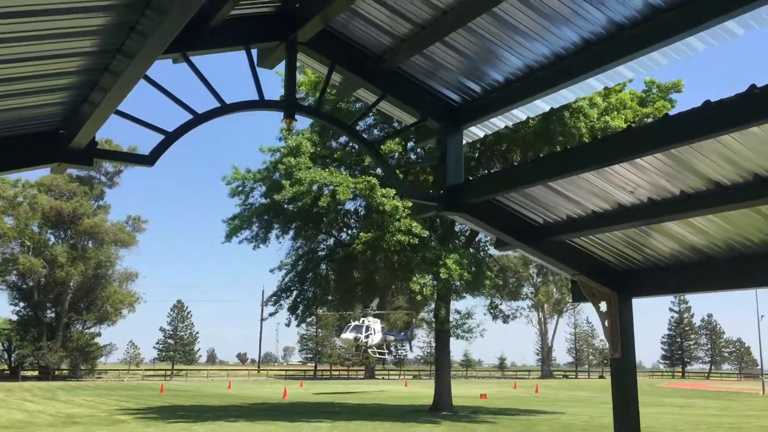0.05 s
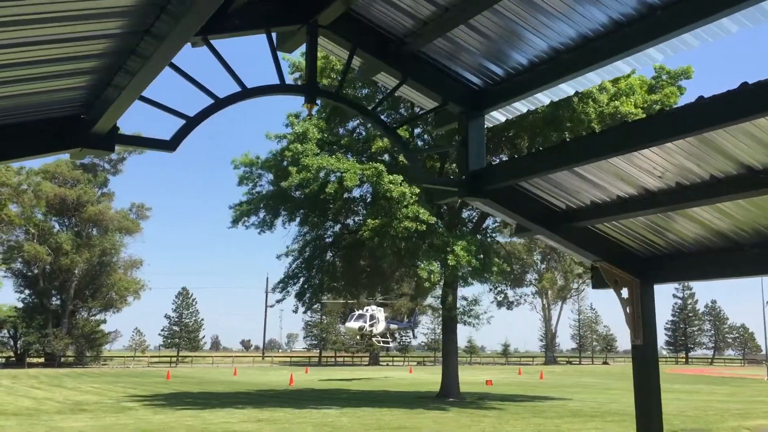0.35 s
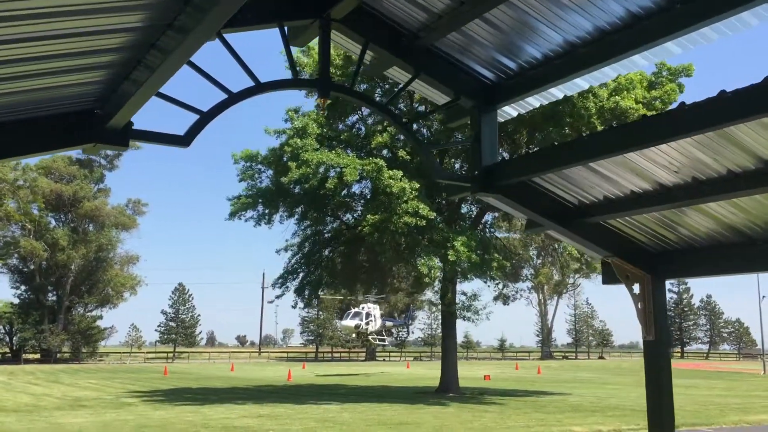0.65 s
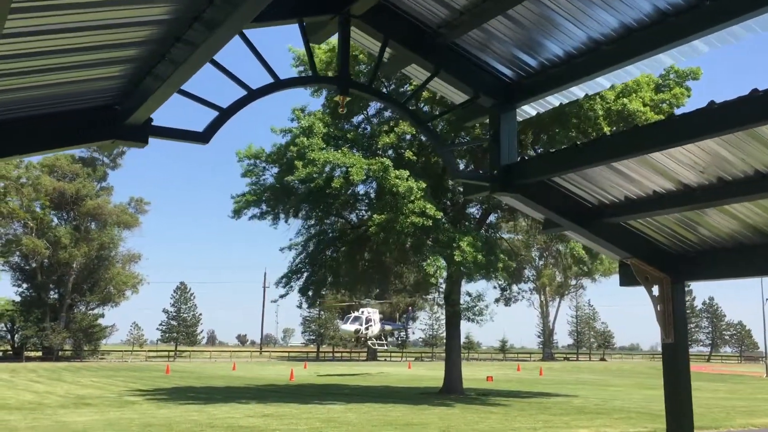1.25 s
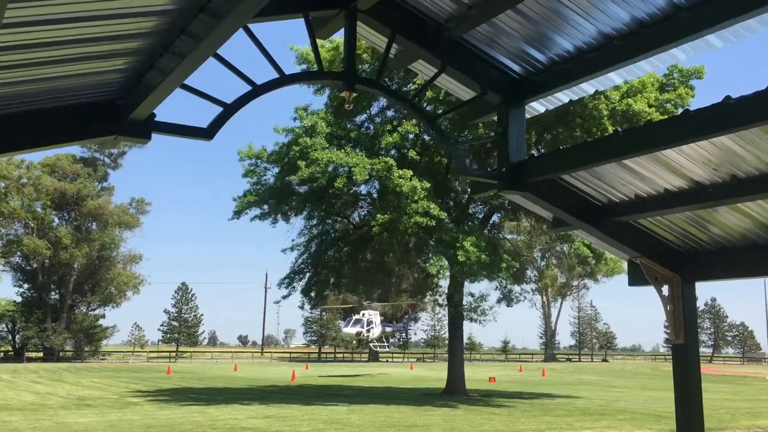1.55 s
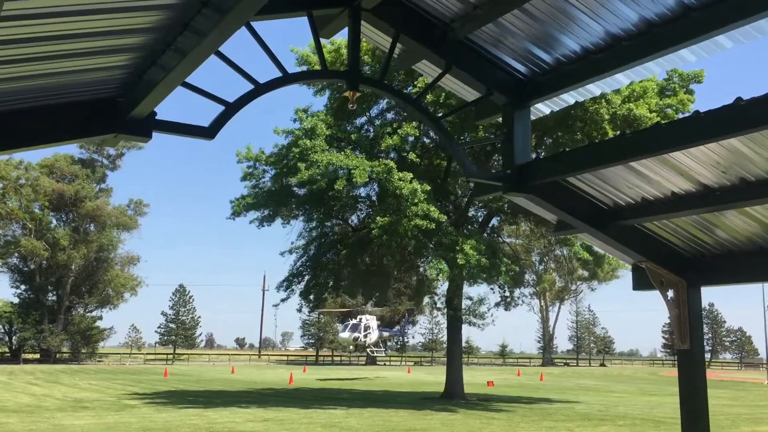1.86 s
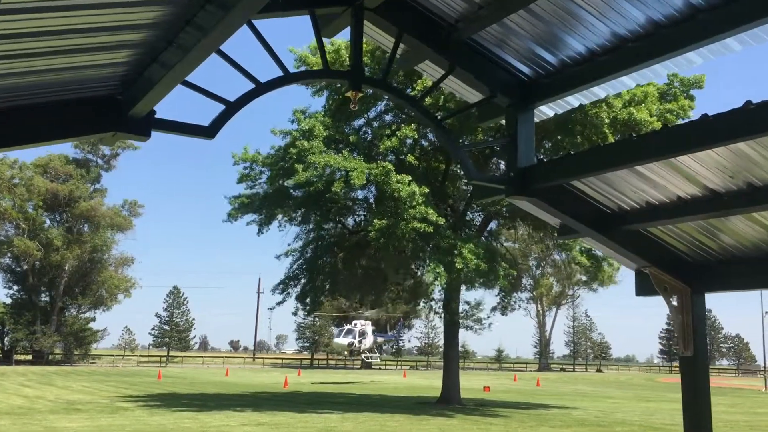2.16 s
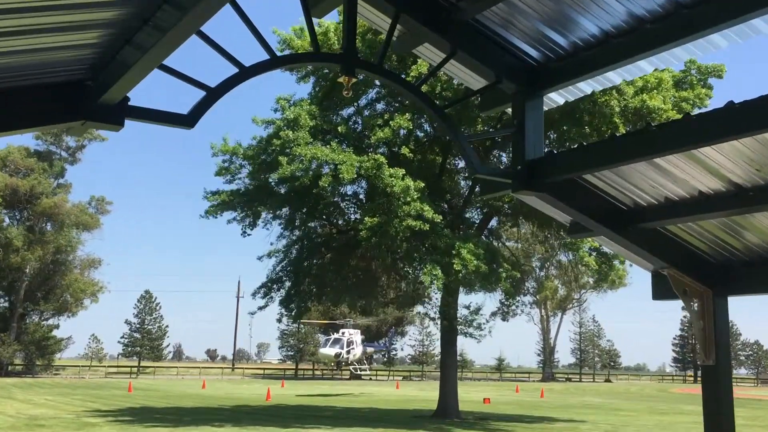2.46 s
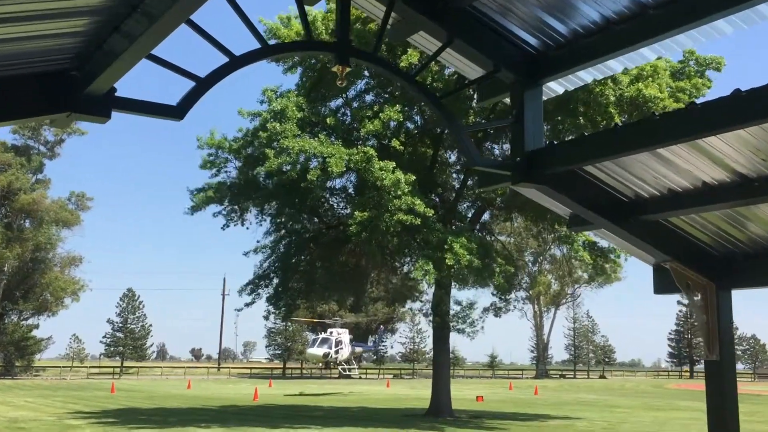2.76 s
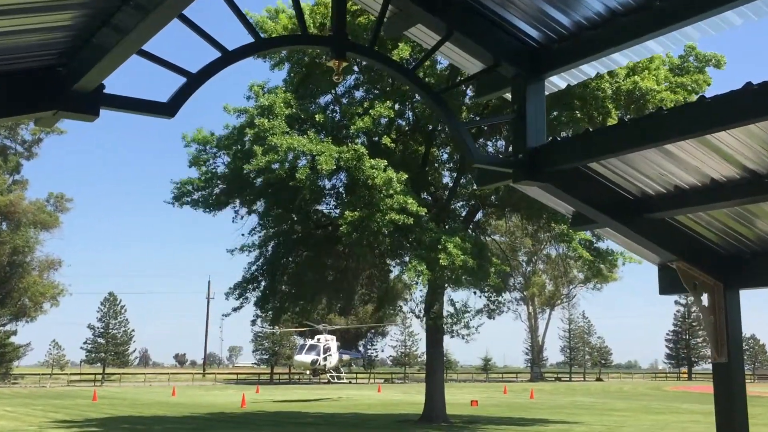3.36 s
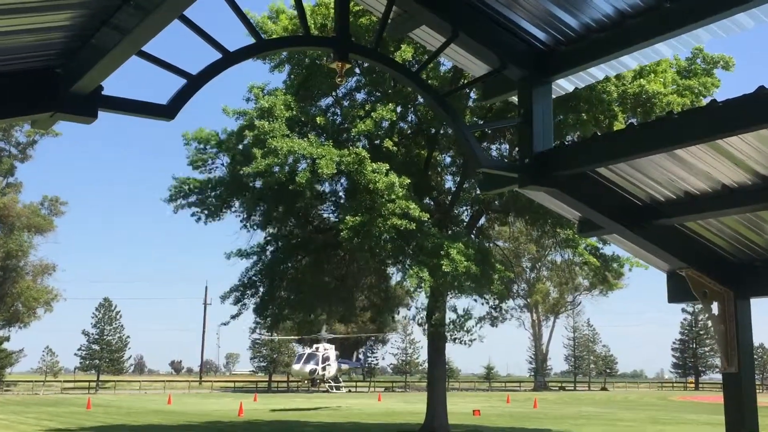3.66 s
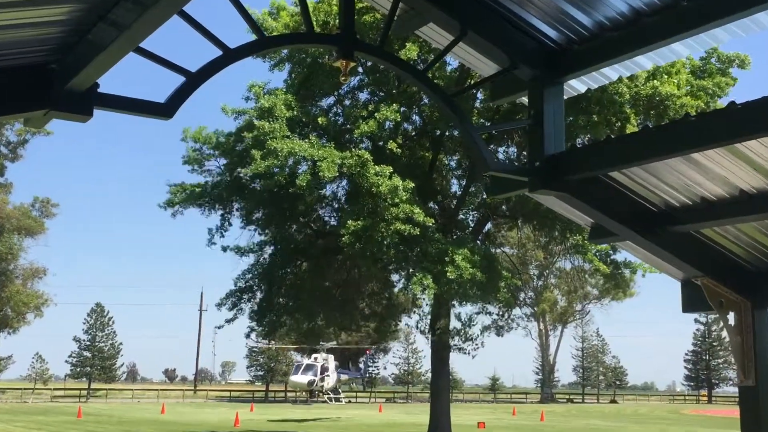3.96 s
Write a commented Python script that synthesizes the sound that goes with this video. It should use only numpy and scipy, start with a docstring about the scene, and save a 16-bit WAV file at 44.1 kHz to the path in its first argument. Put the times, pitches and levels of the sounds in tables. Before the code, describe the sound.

A small helicopter hovers low over a field, heard from under an open shelter. Its blades chop fast and steadily over a roar of air, a low drone and a thin turbine whine, slapping more sharply near the end.

```python
"""The fast chop of a small helicopter hovering low over a field, heard from under an open shelter.
Each main blade swishes, thumps the air and slaps through the swirls (vortices) left by the blade tips.
The slap echoes off the ground and the roof. Behind it the tail rotor drones, the downwash (air pushed
down by the rotor) roars and the turbine whines. One soft knock reaches the microphone."""
import sys
import numpy as np
from scipy import signal
from scipy.fft import rfft, irfft
from scipy.io import wavfile
from scipy.ndimage import uniform_filter1d, minimum_filter1d

SR = 44100
rng = np.random.default_rng(int(sys.argv[2]) if len(sys.argv) > 2 else 0)


def inscribe(sig):
    """Save sig as 16-bit PCM at rate SR to the path in sys.argv[1].

    A 1-D sig is mono; a 2-D sig holds one channel per row.
    Samples are clipped to [-1, 1] before scaling.
    """
    pcm = np.round(np.clip(np.atleast_2d(sig).T, -1, 1) * 32767)
    wavfile.write(sys.argv[1], SR, pcm.astype(np.int16))


N = 176400
TIME = np.arange(N) / SR
PASS_OFFSET_S, PASS_GAP_S = 0.0619, 0.051367  # when one blade passes, and the wait for the next

# Levels in the tables are relative: the functions scale and filter them further.
# how hard the blades slap: (time [s], body [dB], snap [dB], hollow ring [dB], torn air [dB])
SLAP_LEVELS = [(0, -17, -35, -33, -14), (.3, -20, -21, -7.5, -12), (.5, -21, -10, -26, -16),
               (.7, -13, -22, -21, -9.5), (.89, -12, -12, -14.5, -6.5), (1.02, -11.5, -17, -11, -12),
               (1.25, -18, -12.5, -17.5, -11), (1.48, -15, -17, -19, -14), (1.65, -27, -39, -17.5, -12.5),
               (1.9, -16.5, -19, -16, -13.5), (2.1, -14.5, -17, -12.5, -17), (2.3, -15, -32, -7.5, -17),
               (2.45, -15.5, -18, -13, -9.5), (2.57, -11.5, -23, -12.5, -13), (2.75, -16, -18, -24, -13.5),
               (2.95, -16.5, -11, -16, -12.5), (3.3, -18.5, -12.5, -17, -14.5),
               (3.65, -12.5, -8.5, -15, -16), (3.86, -14.5, -8, -9, -13.5), (4, -23, -8, -17, -13.5)]
# the slap comes early or late as the rotor tilts: (time [s], delay [s])
SLAP_DELAY = [(.35, -.0028), (.6, -.0012), (.95, -.0002), (1.5, .0004), (2.1, .0014), (2.55, .0002),
              (3.2, -.0002)]
# pitch of the slap's dull body: (time [s], pitch [Hz])
BODY_HZ = [(1, 510), (2.2, 390), (2.8, 410), (3.6, 460)]
# pitches that move as the helicopter drifts: (time [s], hollow ring [Hz], swish [Hz])
RING_AND_SWISH_HZ = [(0, 530, 1030), (.4, 560, 1080), (.95, 635, 1100), (1.25, 690, 1100), (1.8, 650, 1050),
                     (2.08, 555, 950), (2.3, 615, 1000), (2.65, 660, 1050), (2.82, 660, 1130),
                     (2.97, 670, 1260), (3.1, 680, 1115), (3.6, 665, 1110), (4, 660, 1000)]
# swish of the approaching blade: (time [s], level [dB])
SWISH_LEVEL = [(0, -40), (.25, -14.5), (.7, -25.5), (2.3, -22), (2.65, -13.5), (2.8, -15.5), (3.12, -8),
               (3.3, -19), (4, -19)]
# low punch as the blades take load: (time [s], level [dB], pitch [Hz])
LOAD_PUNCH = [(0, -17, 230), (.18, -12.5, 277), (.37, -8, 308), (.75, -12.5, 244), (1.1, -25, 240.2),
              (3.2, -36.5, 232), (3.5, -11.5, 238), (4, -13.5, 209.9)]
# late echo of the snap, heard as the helicopter drifts: (time [s], level [dB])
SNAP_ECHO_LEVEL = [(3.2, -37.5), (3.77, -7.5), (4, -17)]
# the short sounds in one slap: (delay [s], level [dB], rise [s], fall [s], timing scatter [s])
SWISH_SHAPE = (-.008, -2.5, .005, .006, .00015)
PUNCH_SHAPE = (.002, 0, .003, .0035, .0001)
BODY_SHAPE = (-.002, 4, .0016, .002, .00005)
SNAP_SHAPE = (.0013, 5.8, .0007, .0012, .00007)
HOLLOW_SHAPE = (.001, -2, .0075, .0075, .00003)
SNAP_ECHO_SHAPE = (.0155, 0, .0015, .0025, .00005)
# echoes from ground and roof: (delay [s], gain [ratio])
SLAP_ECHOES = [(.0048, .22), (.0113, -.08)]
# tone colour of the torn air: (frequency [Hz], level [dB])
TORN_AIR_SPECTRUM = [(500, -4), (1200, 1), (2000, -2.5), (2800, -20), (4000, -19.5), (5500, -32.5),
                     (8000, -34)]
# single cracks, where a blade meets a vortex squarely: (time [s], level [dB], pitch [Hz])
VORTEX_HITS = [(.8818, -2, 1950), (.8852, 1, 1550), (.9872, -13, 3700), (2.476, -12, 3700),
               (3.1955, -11, 3450)]
# tones in the thump: (multiple of the blade rate, start level [dB], end level [dB])
THUMP_TONES = [(3, -24, -29), (4, -27, -35), (5, -28.5, -35), (6, -30.5, -38), (8, -46, -30.5)]
# strength of the whole thump: (time [s], level [dB])
THUMP_SWELL = [(.3, -2.5), (.85, -5), (1.6, 0.5)]
# lowest tone of the tail rotor: (time [s], pitch [Hz])
TAIL_PITCH = [(0, 67.7), (.6, 68.5), (4, 68.84)]
# its first three harmonics (multiples of that pitch): (time [s], first [dB], second [dB], third [dB])
TAIL_LEVELS = [(0.0, -28, -33, -26.5), (0.25, -21, -46, -38), (0.6, -28, -23.5, -36), (0.9, -30, -25, -42),
               (1.15, -29, -30.5, -29.5), (1.5, -26, -24.5, -43), (1.7, -22.5, -26.5, -25.5),
               (2.25, -26.5, -22.5, -27.5), (2.85, -25, -24.5, -27), (3.42, -26.5, -35, -28),
               (3.78, -20.5, -19, -24), (4.0, -25, -26.5, -29)]
# its buzz, each of harmonics 4 to 16: (time [s], level [dB])
TAIL_BUZZ_LEVEL = [(0, -36), (1.4, -43.5), (3.1, -42), (3.6, -36), (4, -38)]
# roar of downwash and exhaust: (time [s], level [dB])
ROAR_SWELL = [(0, -14), (1.2, -15.5), (1.7, -17), (3.4, -18), (4, -19)]
# tone colour of that roar: (frequency [Hz], level [dB])
ROAR_SPECTRUM = [(25, -23), (45, -1), (130, 0), (280, -2.5), (400, -6), (560, 1.5), (800, -3),
                 (1050, -0.36), (2000, -4), (2400, -10.5), (2900, -19), (4000, -28), (8000, -46)]
# low rush of the downwash: (time [s], level [dB])
RUSH_SWELL = [(0, -26), (.6, -19.5), (1.2, -27), (1.6, -34.5), (3.1, -39), (3.6, -30), (4, -27)]
# tone colour of that rush: (frequency [Hz], level [dB])
RUSH_SPECTRUM = [(25, -40), (60, -14), (110, 3), (300, -6.5), (600, -22), (1500, -34)]
# tones in the turbine's whine: (pitch [Hz], width [Hz], level [dB])
WHINE_TONES = [(8810, 57, -47), (8750, 450, -43.5), (10370, 70, -65)]
# strength of the whole whine: (time [s], level [dB])
WHINE_SWELL = [(0, -38.5), (.25, -39.5), (.6, -44), (1.4, -45.5), (2.17, -40.5), (2.65, -44.5),
               (2.95, -41.5), (3.6, -45)]
# tone colour of the turbine's hiss: (frequency [Hz], level [dB])
HISS_SPECTRUM = [(1500, -20), (2800, -0.5), (3400, 3.5), (4300, 0.5), (4950, -6.5), (5400, -3.5),
                 (6300, -13), (7250, -6.5), (7800, -15), (10000, -15), (11000, -21.5), (13000, -17.5),
                 (15600, -30)]
# knock on the microphone: (time [s], level [dB], pitch [Hz], width [Hz])
MIC_KNOCK = [(1.8482, 3, 130.5, 54)]


def blade_slap():
    """Each blade swishes in and slaps through the tip vortices; ground and roof echo the sound."""
    passes = pass_times()
    body_db, snap_db, hollow_db, _ = curves(SLAP_LEVELS, passes)
    ring_hz, swish_hz = curves(RING_AND_SWISH_HZ, passes)
    swish_db = curve(SWISH_LEVEL, passes)
    snap_hz = 1050
    slap = each_pass(SWISH_SHAPE, swish_db, swish_hz)
    slap += each_pass(SWISH_SHAPE, swish_db - 4.5, swish_hz * 1.2)  # a softer, higher swish
    slap += each_pass(PUNCH_SHAPE, *curves(LOAD_PUNCH, passes))
    slap += each_pass(BODY_SHAPE, body_db, curve(BODY_HZ, passes))
    slap += each_pass(SNAP_SHAPE, snap_db, snap_hz)
    slap += each_pass(HOLLOW_SHAPE, hollow_db, ring_hz)
    slap += each_pass(SNAP_ECHO_SHAPE, curve(SNAP_ECHO_LEVEL, passes), snap_hz)
    slap = filtered(slap, "band", [120, 3500])
    echoes = sum(gain * np.interp(TIME - delay, TIME, slap, left=0) for delay, gain in SLAP_ECHOES)
    return slap + echoes


def torn_air():
    """Every passing blade tears the air: a burst of noise that swells and dies quickly."""
    delay_s, rise_s, fall_s = .0011, .0044, .0045
    *_, air_db = curves(SLAP_LEVELS)
    air = from_db(air_db - 0.5) * noise(TORN_AIR_SPECTRUM, waver_db=0.5)
    peak_s = PASS_OFFSET_S + curve(SLAP_DELAY) + delay_s
    since_peak = (TIME - peak_s + PASS_GAP_S / 2) % PASS_GAP_S - PASS_GAP_S / 2
    bursts = np.exp(np.minimum(since_peak / rise_s, -since_peak / fall_s))
    return air * bursts * from_db(1.4 * wander(9.7))


def hard_cracks():
    """Now and then a blade meets a vortex squarely and cracks, dulled by distance."""
    cracks = sum(ring(click(at_s, db), hz, width_hz=400) for at_s, db, hz in VORTEX_HITS)
    return filtered(cracks, "low", 4300, order=4)


def rotor_thump():
    """The main blades push the air in deep pulses, built from a few wavering tones."""
    phase = 2 * np.pi * (TIME - PASS_OFFSET_S) / PASS_GAP_S
    thump = np.zeros(N)
    for multiple, start_db, end_db in THUMP_TONES:
        db = np.linspace(start_db, end_db, N) + curve(THUMP_SWELL) + 4.2 * wander(0.65)
        thump += tone(db, multiple * phase + 0.81 * rng.standard_normal())
    return thump


def tail_rotor():
    """The tail rotor drones: three strong, fluttering harmonics with a faint buzz above."""
    phase = 2 * np.pi * np.cumsum(curve(TAIL_PITCH)) / SR
    buzz_levels = [curve(TAIL_BUZZ_LEVEL) + 2 * wander(1.16) for _ in range(4, 17)]
    drone = np.zeros(N)
    for multiple, db in enumerate(curves(TAIL_LEVELS) + buzz_levels, 1):
        flutter_db = 1.9 * wander(8.5)
        drone += tone(db + flutter_db, multiple * phase + 2 * np.pi * rng.random())
    return drone


def downwash():
    """Rotor wind and exhaust make a broad roar, with a low rush that comes and goes."""
    roar = from_db(curve(ROAR_SWELL) - 2.5) * noise(ROAR_SPECTRUM, waver_db=0.95)
    rush = from_db(curve(RUSH_SWELL)) * noise(RUSH_SPECTRUM, waver_db=5.0)
    return roar + rush


def turbine():
    """The engine hisses and whines, its high tones smeared by the churning air."""
    whine = np.zeros(N)
    for hz, width_hz, db in WHINE_TONES:
        bright_noise = np.diff(rng.standard_normal(N + 1))
        whine += from_db(db) * unit_level(ring(bright_noise, hz, width_hz))
    whine = filtered(whine, "band", [6500, 11000])
    swell_db = curve(WHINE_SWELL) + 42.5 + 1.34 * wander(24)  # the offset brings this near 0 dB
    hiss = from_db(-38) * noise(HISS_SPECTRUM, waver_db=1.52)
    return whine * from_db(swell_db) + hiss


def knock():
    """A dull bump on the microphone dies away in a few cycles."""
    bump = sum(ring(-click(at_s, db), hz, width_hz) for at_s, db, hz, width_hz in MIC_KNOCK)
    return filtered(bump, "band", [30, 400])


def pass_times():
    """The moments, in seconds, at which a main blade passes."""
    return PASS_OFFSET_S + PASS_GAP_S * np.arange(-1, N / SR / PASS_GAP_S)


def each_pass(shape, level_db, hz):
    """One short pulse of tone per passing blade, each a little different in time, level and pitch."""
    delay_s, shape_db, rise_s, fall_s, scatter_s = shape
    passes = pass_times()
    time_luck, level_luck, pitch_luck = rng.standard_normal((len(passes), 3)).T
    peaks = passes + curve(SLAP_DELAY, passes) + delay_s + scatter_s * time_luck
    gains = from_db(shape_db + level_db + level_luck)
    pitches = hz * 2 ** (.022 * pitch_luck)
    pulses = np.zeros(N)
    for peak_s, gain, pitch in zip(peaks, gains, pitches):
        near = slice(*np.searchsorted(TIME, [peak_s - PASS_GAP_S, peak_s + PASS_GAP_S]))
        t = TIME[near] - peak_s
        envelope = np.exp(np.where(t < 0, -(t / rise_s) ** 2, -np.abs(t) / fall_s))
        pulses[near] -= gain * envelope * np.cos(2 * np.pi * pitch * t)
    return pulses


def noise(spectrum, waver_db):
    """Noise with the given tone colour, split into five bands that each waver on their own."""
    hz, db = np.transpose(spectrum)
    octave = np.log2(np.maximum(np.arange(N // 2 + 1) * SR / N, 1))
    octaves_outside = np.abs(octave - np.clip(octave, np.log2(hz[0]), np.log2(hz[-1])))
    colour_db = np.interp(octave, np.log2(hz), db) - 20 * octaves_outside
    shaped = rfft(rng.standard_normal(N)) * from_db(colour_db)
    band = np.searchsorted(np.log2([300, 750, 1400, 3000]), octave)
    bands = [irfft(shaped * (band == k), N) for k in range(5)]
    return unit_level(sum(part * from_db(waver_db * wander(2.76)) for part in bands))


def wander(rate_hz):
    """A smooth random curve, typically within 1 of zero; a higher rate makes it move faster."""
    step, warm_up = 40, 2000  # one point every 40 samples; the first 2000 points are dropped
    pole = np.exp(-2 * np.pi * rate_hz * step / SR)
    draws = rng.standard_normal(N // step + warm_up + 2)
    slow = signal.lfilter([1], [1, -2 * pole, pole * pole], draws)[warm_up:]
    return np.interp(np.arange(N) / step, np.arange(len(slow)), unit_level(slow))


def ring(x, hz, width_hz):
    """Make a sound ring at one pitch; a smaller width rings for longer."""
    decay, angle = np.exp(-np.pi * width_hz / SR), 2 * np.pi * hz / SR
    return signal.lfilter([0, np.sin(angle)], [1, -2 * decay * np.cos(angle), decay ** 2], x + 1e-18)


def tone(db, phase):
    """A pure tone whose average (rms) level is db."""
    return np.sqrt(2) * from_db(db) * np.cos(phase)


def click(at_s, db):
    """A click one sample long."""
    return from_db(db) * (np.arange(N) == int(at_s * SR))


def filtered(x, keep, hz, order=2):
    """Keep the "low" side, the "high" side or a "band" of a sound."""
    return signal.sosfilt(signal.butter(order, hz, keep, fs=SR, output="sos"), x)


def curves(table, at=TIME):
    """Join a table's points with straight lines: one curve for each column after the time."""
    times, *columns = np.transpose(table)
    return [np.interp(at, times, column) for column in columns]


def curve(table, at=TIME):
    """The single curve of a (time, value) table."""
    return curves(table, at)[0]


def from_db(db):
    """Turn decibels into a gain to multiply by."""
    return 10 ** (np.asarray(db) / 20)


def unit_level(x):
    """Scale a signal to an average (rms) size of 1."""
    return x / np.sqrt(np.mean(x ** 2) + 1e-20)


def scene():
    """Add up all the sources at one microphone."""
    main_rotor = blade_slap() + torn_air() + hard_cracks() + rotor_thump()
    return (main_rotor + tail_rotor() + downwash() + turbine() + knock())[None]


def record(dry):
    """Cut the deepest bass, turn down the highest peaks (a limiter) and cut the very top treble."""
    x = filtered(dry, "high", 22)
    ceiling, window = .92, int(.003 * SR)
    needed_gain = ceiling / np.maximum(np.abs(x), ceiling)
    smooth_gain = uniform_filter1d(minimum_filter1d(needed_gain, window), window)
    treble_cut = signal.ellip(12, .1, 90, 15650, fs=SR, output="sos")
    return signal.sosfilt(treble_cut, x * smooth_gain)


dry = scene()
out = record(dry)
inscribe(out)
```